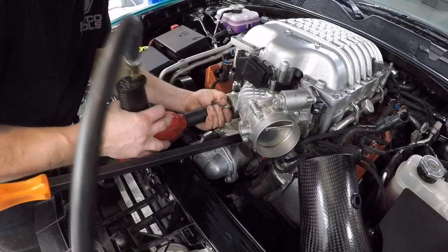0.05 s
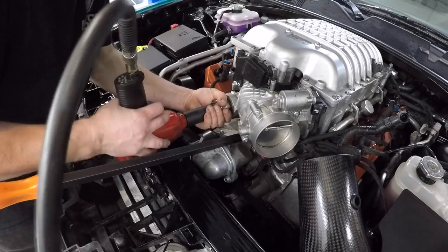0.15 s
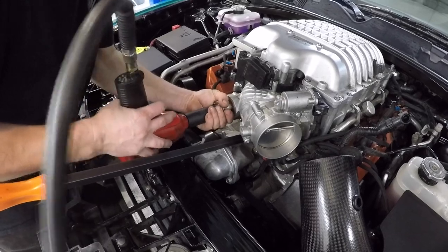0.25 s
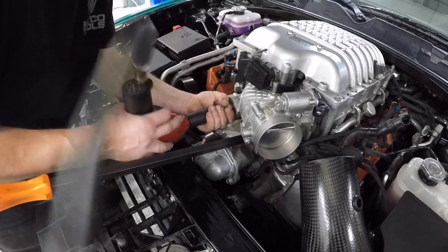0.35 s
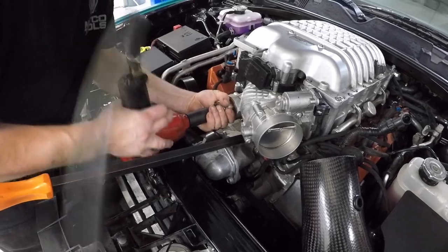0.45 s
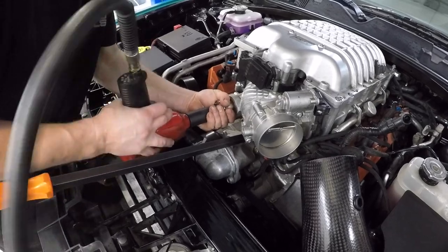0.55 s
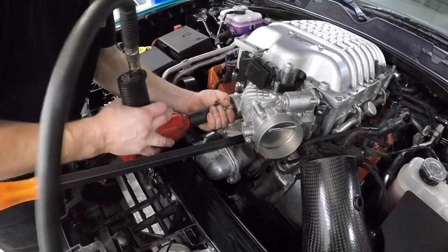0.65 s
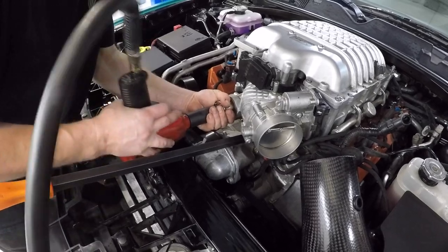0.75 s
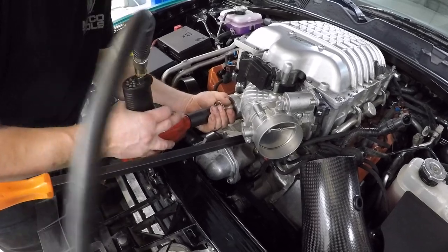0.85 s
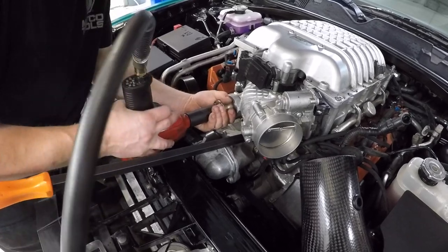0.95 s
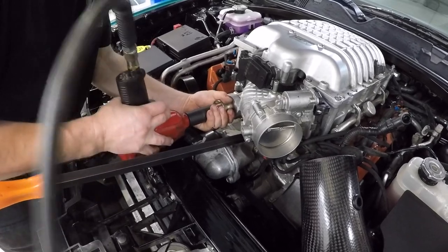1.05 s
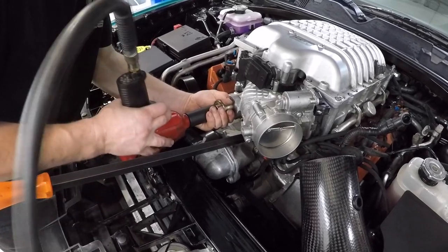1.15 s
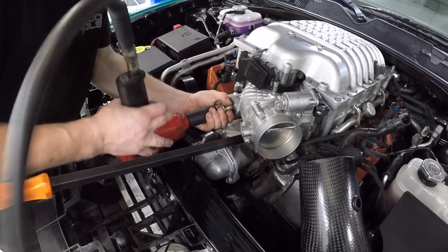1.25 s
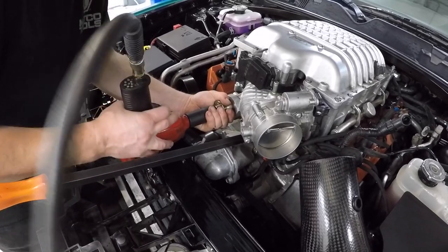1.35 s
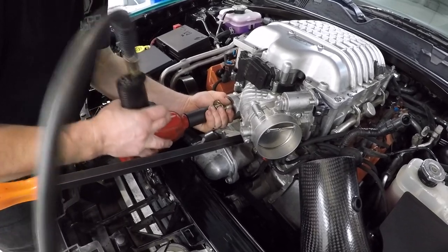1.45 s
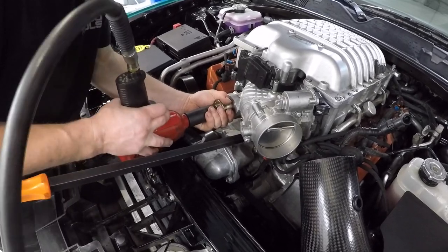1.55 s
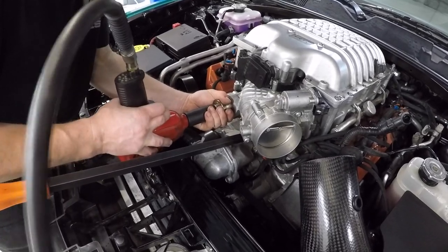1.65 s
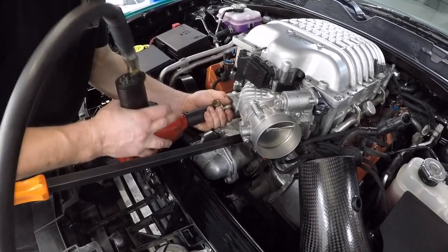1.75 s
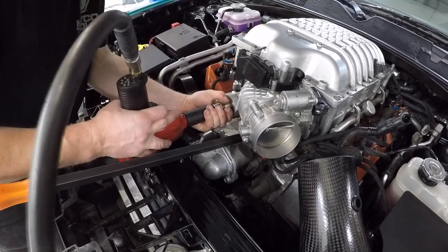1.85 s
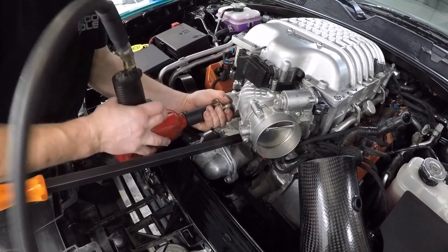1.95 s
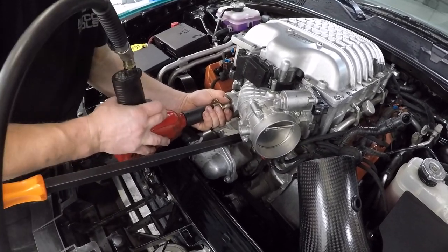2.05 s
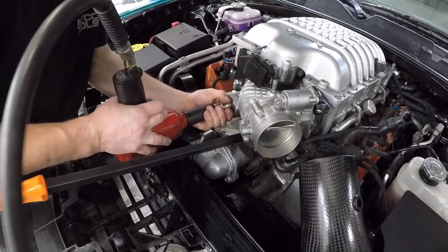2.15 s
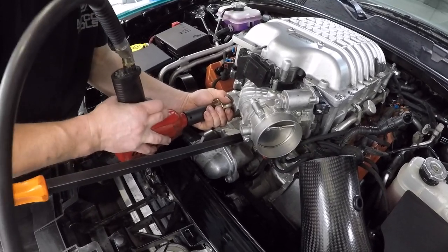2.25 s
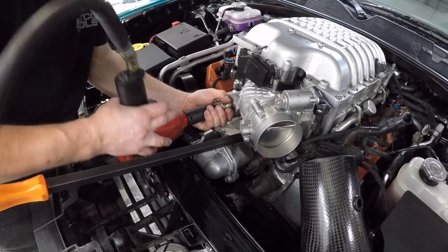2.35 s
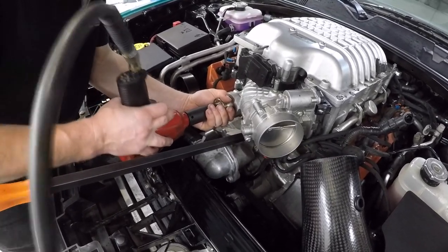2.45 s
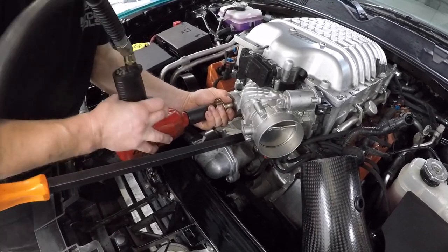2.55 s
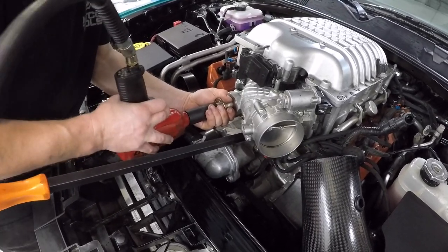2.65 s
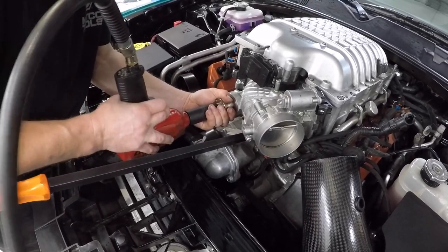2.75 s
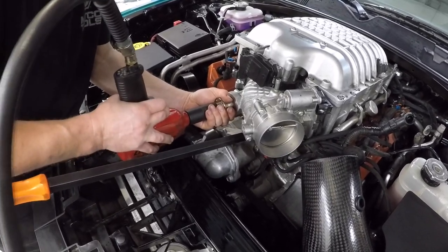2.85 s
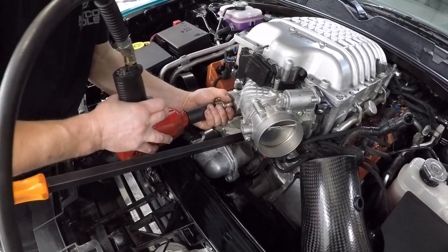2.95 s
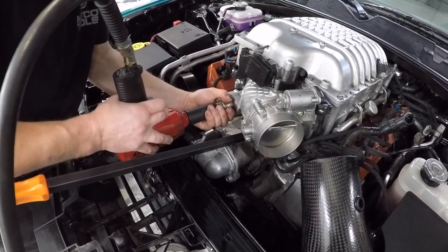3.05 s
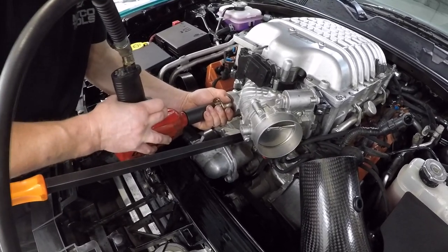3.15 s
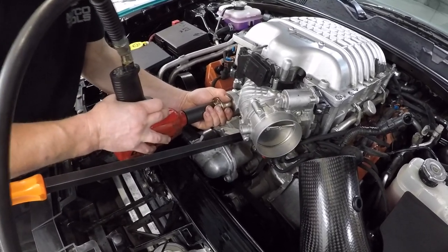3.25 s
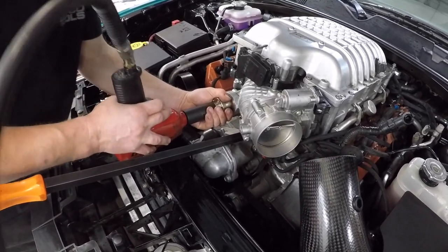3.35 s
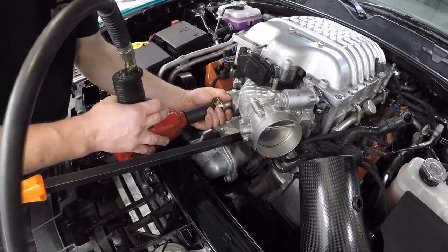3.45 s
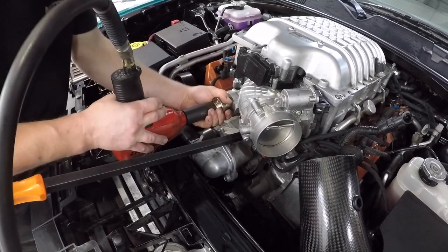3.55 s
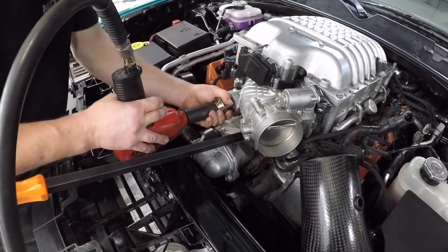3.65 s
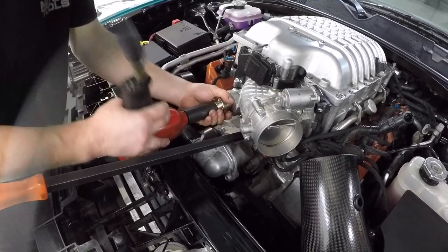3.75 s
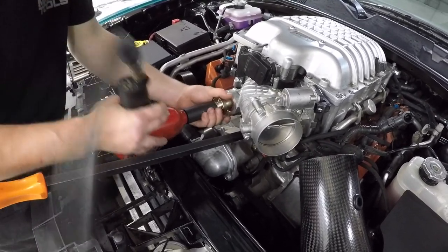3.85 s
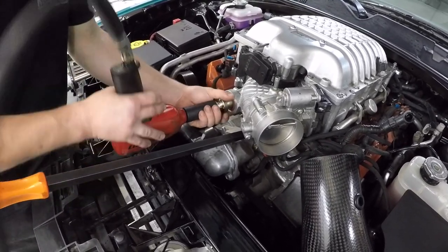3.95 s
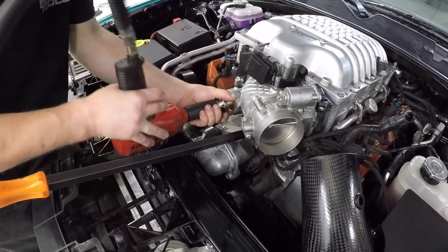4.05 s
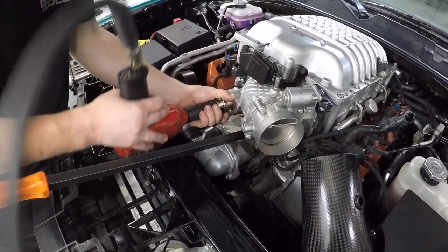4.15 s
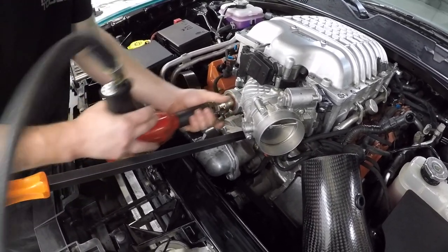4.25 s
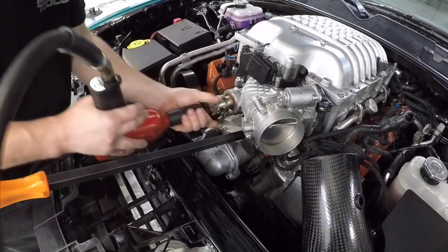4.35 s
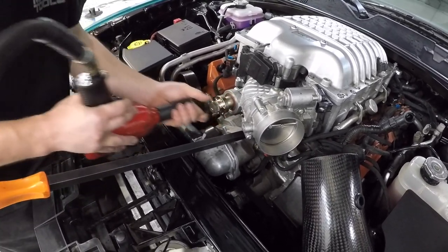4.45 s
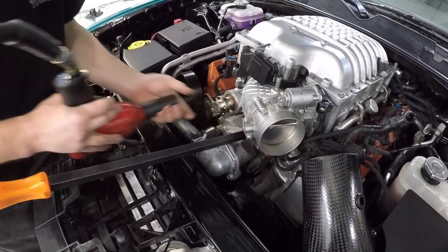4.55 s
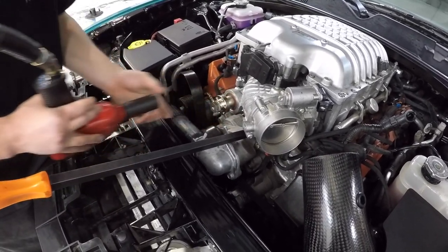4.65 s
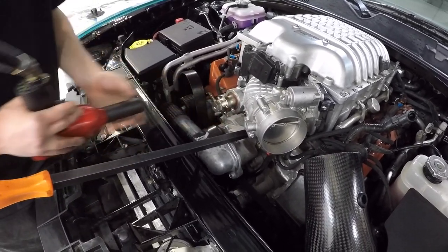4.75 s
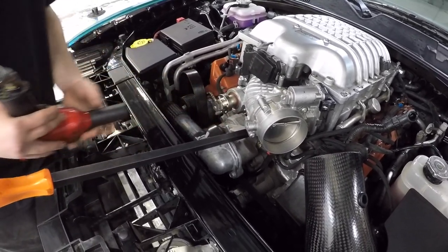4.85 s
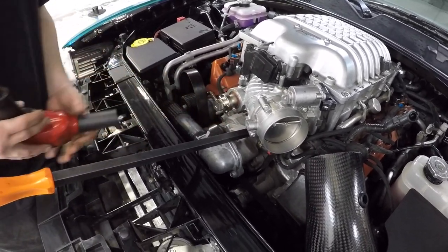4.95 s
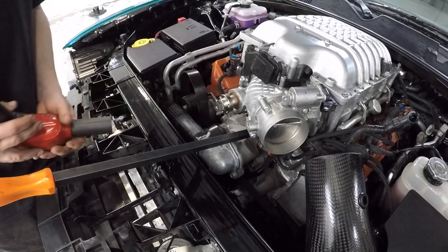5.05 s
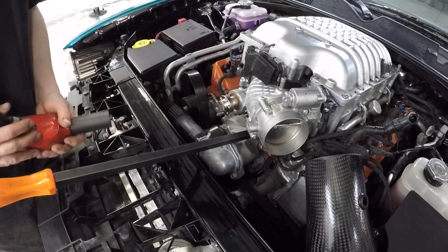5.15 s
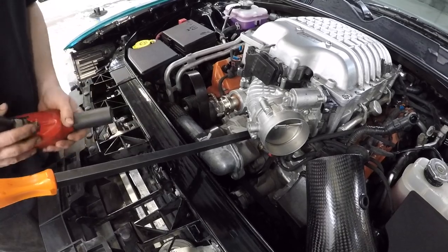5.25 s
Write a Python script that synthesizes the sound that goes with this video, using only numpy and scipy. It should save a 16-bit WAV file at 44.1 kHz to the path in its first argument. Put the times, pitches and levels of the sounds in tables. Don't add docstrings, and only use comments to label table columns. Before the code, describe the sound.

Already running at the start, an air wrench rattles loudly at about twenty blows a second, stopping and restarting in short pulls. Loose metal clacks fill some gaps and a long bright reverberation hangs in the large garage. After the final pull, background ventilation slowly grows louder while the socket comes off, fittings knock lightly and air whistles faintly.

```python
import sys
import numpy as np
from scipy import signal
from scipy.fft import rfft, irfft
from scipy.io import wavfile
from scipy.ndimage import uniform_filter1d

SR = 44100
rng = np.random.default_rng(int(sys.argv[2]) if len(sys.argv) > 2 else 0)


def log_audio(samples):
    frames = np.atleast_2d(samples).T
    limited = np.clip(frames, -1, 1)
    pcm = np.round(limited * 32767).astype(np.int16)
    wavfile.write(sys.argv[1], SR, pcm)


def amp(db):
    return 10 ** (np.asarray(db, float) / 20)


N = 233730
T = np.arange(N) / SR
DIRECT_SHARE = 0.34
LEFT_LEAD_S, LEAD_FROM_HZ = 0.0002815, 580


def at_hz(points, hz, column=1):
    rows = np.array(points)
    return np.interp(np.log(np.maximum(hz, 1)), np.log(rows[:, 0]), rows[:, column])


def decay_per_sample(t60):
    return amp(-60 / (t60 * SR))


# frequency in Hz, likeness from -1 to 1.
EAR_LIKENESS = [(40, 0.7), (120, 0.85), (300, 1), (640, 0.31), (1400, -0.17), (3000, 0.19), (7000, -0.1),
                (15000, -0.78)]


def stereo_noise(spectrum, direct=0):
    hz = np.arange(N // 2 + 1) * SR / N
    mid, side = rfft(rng.standard_normal((2, N))) * amp(at_hz(spectrum, hz))
    alike = np.clip(at_hz(EAR_LIKENESS, hz), -1, 1)
    alike = alike + np.clip(direct, 0, 1) * (1 - alike)
    left_right = np.array([[1], [-1]])
    pair = np.sqrt(1 + alike) * mid + np.sqrt(1 - alike) * side * left_right
    lead_s = (direct > 0) * LEFT_LEAD_S
    pair = pair * np.exp(1j * np.pi * lead_s * np.maximum(hz - LEAD_FROM_HZ, 0) * left_right)
    pair = irfft(pair, N)
    return pair / pair.std()


def clicks_at(s, size):
    train = np.zeros(N)
    index = np.clip((np.ravel(s) * SR).astype(int), 0, N - 1)
    np.add.at(train, index, np.ravel(size))
    return train


def ring(clicks, hz, t60):
    r, w = decay_per_sample(t60), 2 * np.pi * hz / SR
    return signal.lfilter([0, np.sin(w)], [1, -2 * r * np.cos(w), r * r], clicks + 1e-18)


def struck(modes, s, level_db, spread_db):
    out = np.zeros((2, N))
    for hz, mode_db, t60 in modes:
        sign_draw, level_draw = rng.standard_normal((2,) + s.shape)
        size = np.sign(sign_draw) * amp(level_db + mode_db + spread_db * level_draw)
        rung = ring(clicks_at(s, size), hz, t60)
        lag = int(rng.random() * SR / hz) if hz > 600 else 0
        out += [rung, np.roll(rung, lag)]
    return out


def beats(runs, spread_db):
    cycle_s = .047
    rows = []
    for first, last, first_db, last_db, *rest in runs:
        count = round((last - first) / cycle_s) + 1
        rows.append(np.linspace([first, first_db, *rest], [last, last_db, *rest], count))
    rows = np.vstack(rows)
    rows[:, 1] += spread_db * rng.standard_normal(len(rows))
    return rows


# opening in seconds, shutting in seconds, air level at the start in dB,
# air level at the end in dB, valve surge in dB.
TRIGGER_PULLS = [
    (-.01, 0.223, -24.5, -27, -16),
    (0.371, 0.707, -25, -25, -14.5),
    (0.929, 1.241, -21.5, -27.5, -20),
    (1.375, 1.691, -23, -26, -16.5),
    (1.85, 2.279, -24, -26.5, -17.5),
    (2.409, 3.257, -25, -26.5, -16.5),
]
# frequency in Hz, level in dB per Hz.
JET_HISS = [(180, -8), (300, -9.5), (808, -9), (2040, -8), (3070, -13.5), (3340, -9.5), (4490, -7),
            (4960, -12.5), (5950, -3.5), (11500, -31), (15500, -45)]
# frequency in Hz, level in dB per Hz.
VALVE_SURGE = [(290, -15), (500, -2), (758, -24), (1580, -0.5), (2230, -25), (4070, 0.5), (5510, -5.5),
               (6000, 3), (15500, -28.5)]


def air_jet(opened):
    flow, surge = np.zeros((2, N))
    for on, off, start_db, end_db, surge_db in TRIGGER_PULLS:
        opening = np.clip((T - on) / 0.015, 0, 1) ** 2
        closing = np.clip(1 - (T - off) / .02, 0, 1) ** 2
        flow += opening * closing * amp(np.interp(T, [on, off], [start_db, end_db]))
        peak = on + .01
        surge += amp(surge_db) * np.exp(-np.abs(T - peak) / np.where(T < peak, .004, .012))
    hiss = flow * (0.91 + 0.62 * opened) * stereo_noise(JET_HISS, DIRECT_SHARE)
    return hiss + surge * stereo_noise(VALVE_SURGE, DIRECT_SHARE)


# first in seconds, last in seconds, first level in dB,
# last level in dB, width in ms.
EVEN_PUFFS = [(.0687, .1971, -7, -8.5, 1.95), (.4905, .674, -10.5, -16, 2.1),
              (.9543, 1.2032, -11.5, -13.5, 2.24), (1.4058, 1.5, -14.5, -16, 3.7),
              (1.558, 1.6497, -13, -14.2, 2.94), (1.9342, 2.0183, -14.5, -16, 2.4),
              (2.077, 2.2194, -12.2, -12.5, 2.67), (2.5314, 2.869, -14.5, -13.5, 2.2),
              (2.9201, 3.1125, -15.5, -15.5, 2.1)]
# time in seconds, level in dB, width in ms.
STUMBLING_PUFFS = [(.0015, -8, 2.2), (0.0181, -6.5, 3), (.0632, -10, 2.2), (.4, -13, 1.6),
                   (0.4059, -12, 2.8), (0.4133, -14, 2.3), (0.4415, -12.5, 2.5), (.4469, -16.5, 1.8),
                   (.973, -11, 3.3), (1.0696, -12.5, 1.4), (1.1978, -17, 2.2), (1.4268, -12, 1.2),
                   (1.4658, -14.5, 1.5), (1.5168, -13, 1.9), (1.6615, -14.5, 3), (1.8804, -11, 2.7),
                   (1.8896, -12, 1.34), (1.9866, -15.9, 1.5), (2.042, -14.5, 1.4), (2.265, -18.5, 3),
                   (2.427, -15, 1.8), (2.4465, -11.5, 1.23), (2.4796, -13, 3), (2.5235, -15.5, 1.9),
                   (2.6237, -13, 2.6), (2.6702, -16, 1.8), (3.157, -19.5, 2.4), (3.2136, -16, 2.3)]


def exhaust_puffs():
    rows = np.vstack([beats(EVEN_PUFFS, spread_db=1), STUMBLING_PUFFS])
    return sorted(map(tuple, rows))


def add_pulse(track, s, width_ms, level_db, skew=0.78):
    around = np.arange(-400, 400)
    x = around / SR * 1000 / width_ms
    at = round(s * SR) + around
    inside = (at >= 0) & (at < N)
    shape = (x ** 2 - 1 - skew * x) * np.exp(-x ** 2 / 2)
    track[at[inside]] += (amp(level_db) * shape)[inside]


# time in seconds, bright part in dB, heavy part in dB,
# thud in dB, socket ring in dB.
LOOSE_CLACKS = [
    (.316, -25, -20, -28, -28),
    (2.307, -17.5, -16.5, -23, -18),
    (3.299, -35, -32, -45, -46),
    (3.372, -31.5, -29, -44, -42),
    (3.799, -67, -54.5, -34, -75.5),
]


def vane_motor(strikes, puffs, top_hz=345, sag_hz=0.457):
    pulses, gate = np.zeros(N), []
    blows = np.append(strikes[:, 0], np.inf)
    starts = [row[0] for row in puffs] + [np.inf]
    uneven = rng.standard_normal((len(puffs), 30))
    for (s, db, width_ms), following, luck in zip(puffs, starts[1:], uneven):
        add_pulse(pulses, s, 0.72 * width_ms, db + 0.22)
        gate.append((s - .0045, amp(db + 17.5)))
        blow = min(blows[blows > s][0], s + 0.0404)
        s += .0025
        for wobble in luck:
            ms_to_blow = 1000 * (blow - s)
            hz = max(top_hz - sag_hz * ms_to_blow ** 2, 150.)
            s += (1 + 0.044 * wobble) / hz
            if s > min(blow + .002, following - .004):
                break
            pulse_db = .5 * db - 17.0 - 0.6 * (top_hz - hz) / 100 + 1.3 * wobble
            add_pulse(pulses, s, 235 / hz, pulse_db)
            gate.append((s - .5 / hz, .3))
    for s, db in strikes:
        add_pulse(pulses, s + 0.0139, 1.9, db - 6.)
        add_pulse(pulses, s + 0.0033, 1.4, db - 16.0)
    for on, off, *_ in TRIGGER_PULLS:
        add_pulse(pulses, on + 0.011, 3., -26.)
        gaps = np.cumsum(rng.uniform(0.0129, 0.024, size=5))
        for k, gap in enumerate(gaps):
            add_pulse(pulses, off + 0.0069 + gap, 2.2, -29. - 3.6 * k)
    for s, _, _, thud_db, _ in LOOSE_CLACKS:
        add_pulse(pulses, s + 0.0037, 1.5, thud_db)
    fade = decay_per_sample(0.011)
    opened = clicks_at(*np.maximum(np.transpose(gate), 0))
    opened = signal.lfilter([300 * (1 - fade) ** 2], [1, -2 * fade, fade ** 2], opened)
    return pulses, opened


# first in seconds, last in seconds, first level in dB, last level in dB.
EVEN_BLOWS = [(.0388, .0388, -16.5, -20), (.088, .2171, -16, -15), (.4196, .6445, -15, -15.5),
              (.6936, .6936, -17, -16), (.9802, 1.2252, -14.5, -15), (1.4265, 1.678, -15, -15.5),
              (1.8967, 1.8967, -13.5, -13), (1.9513, 2.2415, -15.5, -16), (2.4552, 2.7924, -16.5, -16),
              (2.8423, 3.1835, -16.5, -16), (3.2355, 3.2355, -15, -16)]


def hammer_blows():
    return beats(EVEN_BLOWS, spread_db=.8)


# delay in ms, bright parts in dB, heavy parts in dB.
BLOW_CONTACTS = [
    (0., 1, -7.5),
    (1.3, 4.5, -2.5),
    (2.8, -5.5, 0),
    (4.3, -5, -7.5),
    (5.8, 2.5, -1),
    (7.3, -4, -3.5),
    (9.2, -5.5, -9.5),
    (11.4, -2.5, -6.5),
]
# frequency in Hz, level in dB, 60 dB decay in seconds.
CASE_MODES = [(3524, -4, 0.01), (3850, -9.5, 0.018), (4303, -9, 0.022), (4430, -5.5, 0.015),
              (4560, -14.5, 0.0068), (5210, -3.5, 0.014), (5870, -5, .015), (6790, -5.5, 0.015),
              (7100, -11, 0.0093)]
# frequency in Hz, level in dB, 60 dB decay in seconds.
BOLT_MODES = [(832, -17.5, 0.056), (976, -11.5, 0.035), (1266, -4, 0.014), (1368, -2, 0.019),
              (1614, -8, 0.034), (1810, -19, 0.016), (2039, -3.5, 0.041), (2062, -3.5, 0.052),
              (2260, -18, 0.048), (2430, -20.5, 0.2), (2584, -6, 0.018), (300.5, -9, 0.053)]
# frequency in Hz, level in dB, 60 dB decay in seconds.
ANVIL_MODES = [(3300, -2.5, 0.0031), (4130, -2.5, 0.012), (4410, -7, 0.0084), (5276, -1.5, 0.011),
               (6340, 2.5, 0.0066)]
# frequency in Hz, level in dB, 60 dB decay in seconds.
LOAD_MODES = [(1416, -2, 0.027), (2045, 2.5, 0.033), (1030, -12.5, 0.012)]
# frequency in Hz, level in dB per Hz.
STEEL_CRACK = [(240, -37), (400, -27), (1710, -4.5), (2030, -6), (3300, -8), (6000, -6.5), (9500, -23),
               (10600, -51), (13300, -42), (15500, -70)]
ANVIL_HZ, ANVIL_T60_S = 6040, 0.18
SOCKET_HZ, SOCKET_T60_S = 6470, 0.12


def clatter(strikes):
    delay, bright_db, heavy_db = np.transpose(BLOW_CONTACTS)
    hits = np.array([(s, db, db) for s, db in strikes] + [row[:3] for row in LOOSE_CLACKS])
    start, hit_bright_db, hit_heavy_db = hits[:, :1], hits[:, 1:2], hits[:, 2:3]
    jitter = .4 * (delay > 0) * rng.standard_normal((len(hits), len(delay)))
    s = start + (delay + jitter) / 1000
    opposite = amp(2.) * np.array([[1], [-1]])

    modes = struck(CASE_MODES, s, hit_bright_db + bright_db - 4.0, spread_db=3.5)
    modes += struck(BOLT_MODES, s, hit_heavy_db + heavy_db - 2.5, spread_db=2.0)
    modes += struck(ANVIL_MODES, s[:, :1], hit_bright_db + 3.5, spread_db=2.0)
    blows = len(strikes)
    anvil = clicks_at(s[:blows, 0], amp(hits[:blows, 1] - 19.0))
    louder_left = amp([[2.], [-2.]])
    modes += ring(anvil, ANVIL_HZ, ANVIL_T60_S) * louder_left
    modes += struck(LOAD_MODES, s[:, 4:5], hit_heavy_db - 2.5, spread_db=2.5)
    clack_s, _, _, _, ring_db = np.transpose(LOOSE_CLACKS)
    socket = clicks_at(clack_s + [[.004], [.009]], amp(ring_db + [[-6.], [-3.]]))
    modes += ring(socket, SOCKET_HZ, SOCKET_T60_S) * louder_left

    top_cut = signal.butter(4, 7500, fs=SR, output="sos")
    burst = clicks_at(s, amp(hit_bright_db + bright_db - 5.5))
    burst = signal.lfilter([1], [1, -decay_per_sample(0.016)], burst)
    burst = uniform_filter1d(burst, size=14)
    return signal.sosfilt(top_cut, modes) + burst * stereo_noise(STEEL_CRACK, DIRECT_SHARE)


# frequency in Hz, 60 dB decay in seconds, level in dB.
ROOM_TAIL = [(60, 0.43, -18), (253, 0.56, -21), (637, 2.1, -18), (1440, 2.73, -14.5), (3600, 1.8, -19),
             (7000, 1.2, -21.5), (14000, 0.53, -18)]
# frequency in Hz, level in dB.
BAY_OPENING = [(400, 4), (520, -2.5), (850, 2.5), (1000, 6), (1150, -5), (1850, -1), (2050, -8), (2250, 2),
               (4000, -3.5), (4400, -2), (5250, -3), (5700, -2)]


def garage(x):
    t, tail = T[:2 * SR], np.zeros((2, 2 * SR))
    for hz, t60, db in ROOM_TAIL:
        band = [hz / 1.655, min(hz * 1.49, .45 * SR)]
        sos = signal.butter(2, band, "band", fs=SR, output="sos")
        noise = signal.sosfilt(sos, rng.standard_normal(tail.shape))
        tail += noise * amp(db - 60 * t / t60 - 31.5)
    tail *= np.clip((t - .006) / 0.003, 0, 1)
    tail = irfft(rfft(tail) * amp(at_hz(BAY_OPENING, np.arange(SR + 1) / 2)))
    return signal.fftconvolve(x, tail, axes=1)[:, :N]


# frequency in Hz, level in dB per Hz.
SHOP_NOISE = [(15, -30), (30, -4), (90, -2.5), (140, -3), (198, 0.5), (280, -10), (500, -12.5),
              (740, -16.5), (1500, -14.5), (3000, -18.5), (5500, -22.5), (8000, -36.5), (13500, -52),
              (15500, -71)]
# frequency in Hz, level in dB.
MOTOR_TONES = [
    (587, -8),
    (861, -19),
    (1362, -21),
]
# time in seconds, level in dB.
HOSE_LEAK = [
    (4.5, -70),
    (4.76, -49),
    (4.95, -45.5),
    (5.1, -47),
    (5.3, -70),
]
SHOP_DB, RECOVERY_FROM_S, RECOVERY_DB_PER_S = -48, 3.647, 11.5


def shop():
    sway = uniform_filter1d(rng.standard_normal((len(MOTOR_TONES), N)), size=4000).cumsum(axis=1)
    tones = np.zeros(N)
    for (hz, db), wander in zip(MOTOR_TONES, sway):
        tones += amp(db) * np.sin(2 * np.pi * (hz * T + 0.00054 * wander))
    whistle = stereo_noise([(5100, -30), (5380, -8), (5490, -3), (5620, 1), (5900, -30.5)])
    leak = whistle * amp(np.interp(T, *np.transpose(HOSE_LEAK)))
    gain = amp(SHOP_DB + RECOVERY_DB_PER_S * np.maximum(T - RECOVERY_FROM_S, 0))
    return gain * (stereo_noise(SHOP_NOISE) + tones) + leak


# time in seconds, dull knock in dB,
# bright tick in dB.
KNOCKS = [
    (4.15, -34.5, -46),
    (4.164, -36, -60),
    (4.187, -41, -47),
    (4.6, -48, -65),
    (4.621, -48, -65),
    (5.134, -33, -33),
]
# frequency in Hz, level in dB, 60 dB decay in seconds.
FITTING_MODES = [(680, 4, 0.033), (908, 3.5, 0.035), (1265, -2, .035), (1360, -3, .04), (1780, 1, 0.027),
                 (2150, 8.5, 0.03), (2430, -2, .03)]


def handling():
    s, knock_db, tick_db = np.transpose(KNOCKS)
    tick = signal.lfilter([1], [1, -decay_per_sample(.03)], clicks_at(s, amp(tick_db)))
    tick = tick * stereo_noise([(1500, -22), (3000, 6), (7000, -7), (13500, -6), (16000, -40)])
    contacts = s[:, None] + [0, .0025, .006, .0095]
    return struck(FITTING_MODES, contacts, knock_db[:, None] - 8.5, spread_db=4.0) + tick


def scene():
    strikes = hammer_blows()
    pulses, opened = vane_motor(strikes, exhaust_puffs())
    bass_cut = signal.butter(1, 35., "high", fs=SR, output="sos")
    far_ear = signal.sosfilt(bass_cut, pulses)
    exhaust = np.array([amp(0.2) * pulses, amp(-1.3) * far_ear])
    tool = air_jet(opened) + exhaust + clatter(strikes) + handling()
    return tool + garage(tool) + shop()


def low_pass(x):
    return signal.sosfilt(signal.butter(12, 15730, fs=SR, output="sos"), x)


def record(dry):
    mix = 1.3 * np.tanh(dry / 1.3)
    return low_pass(mix)


dry = scene()
out = record(dry)
log_audio(out)
```